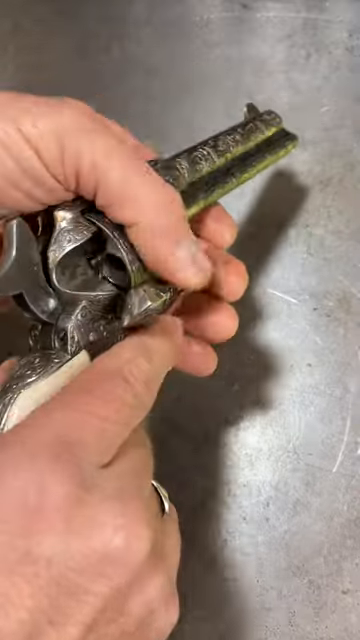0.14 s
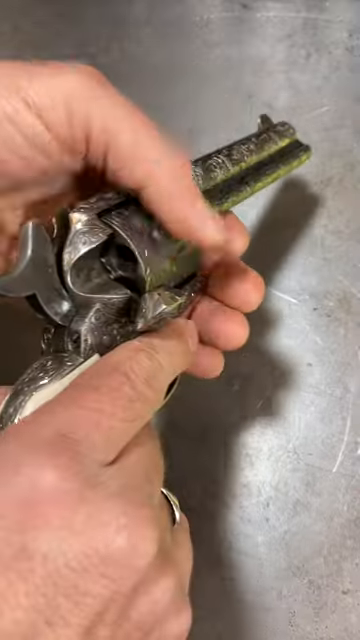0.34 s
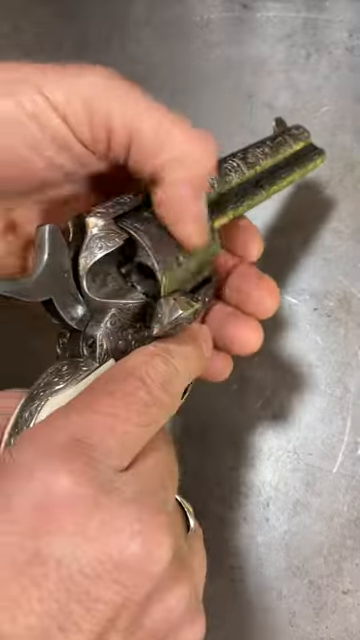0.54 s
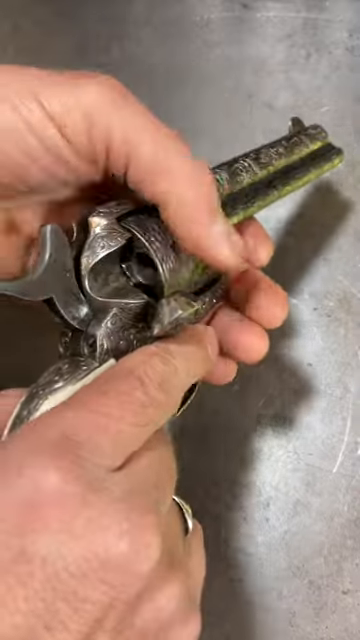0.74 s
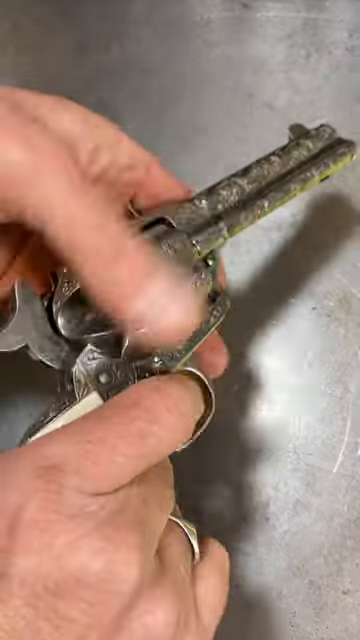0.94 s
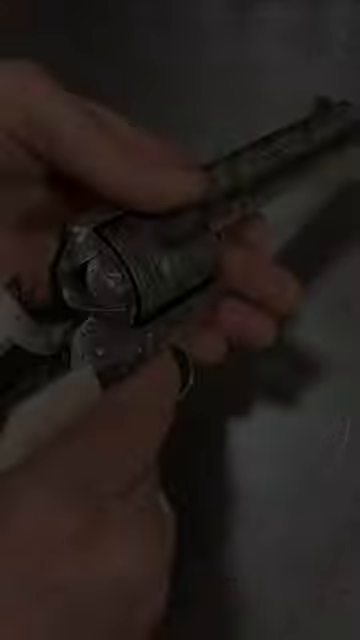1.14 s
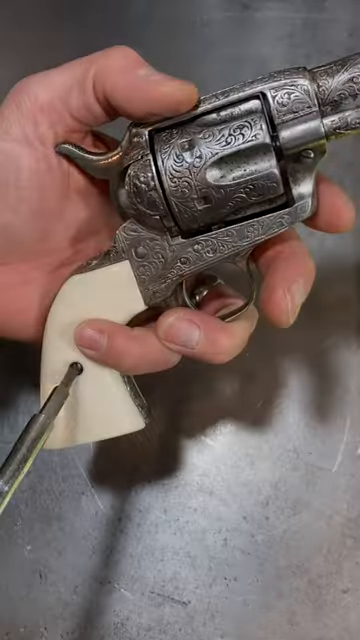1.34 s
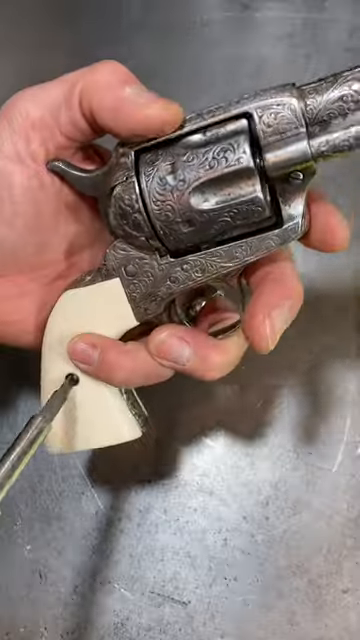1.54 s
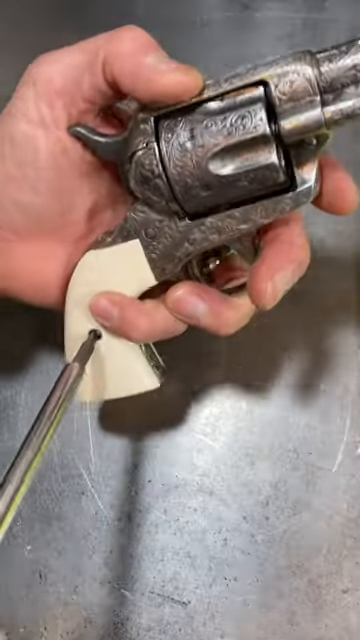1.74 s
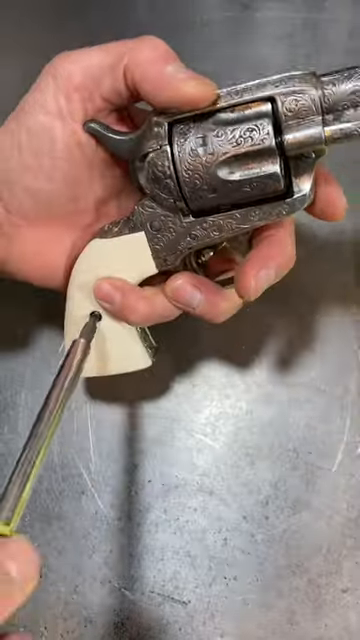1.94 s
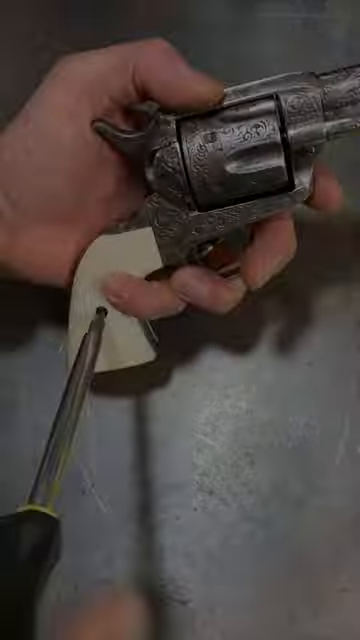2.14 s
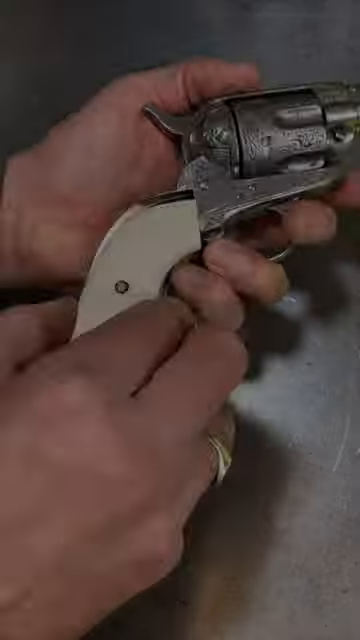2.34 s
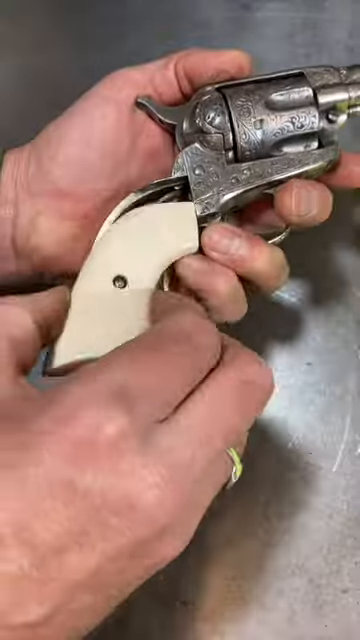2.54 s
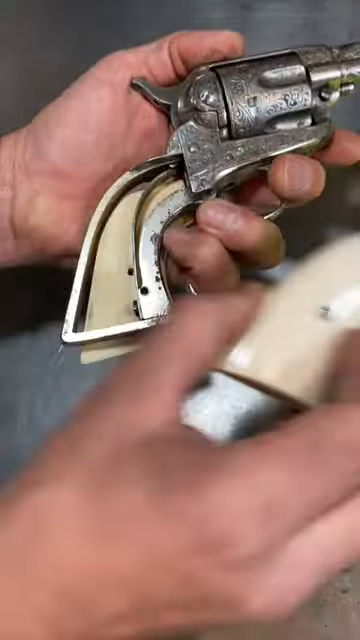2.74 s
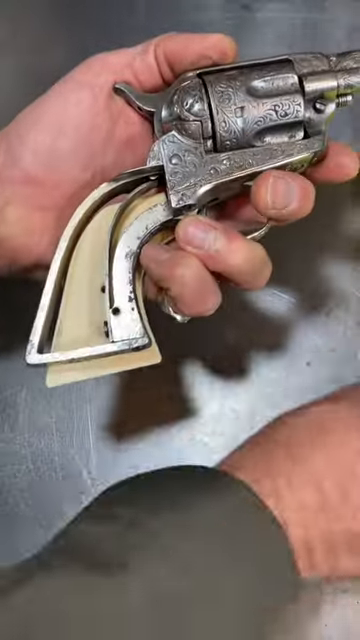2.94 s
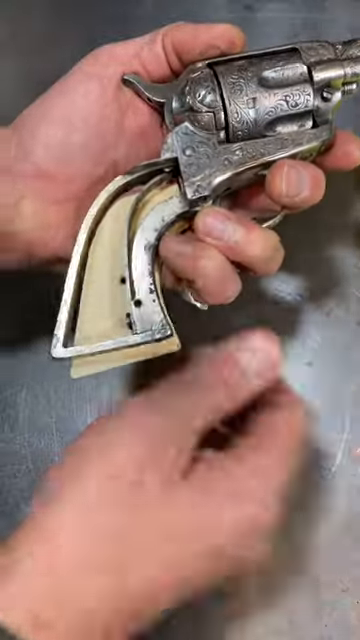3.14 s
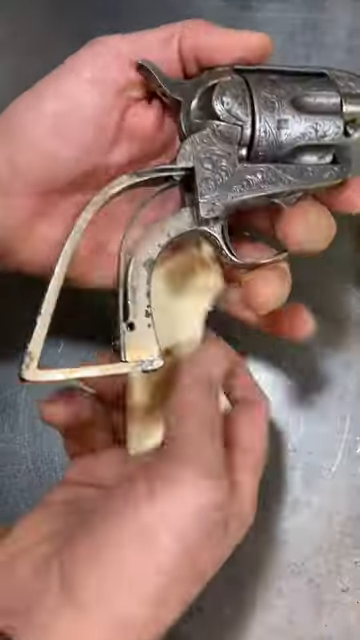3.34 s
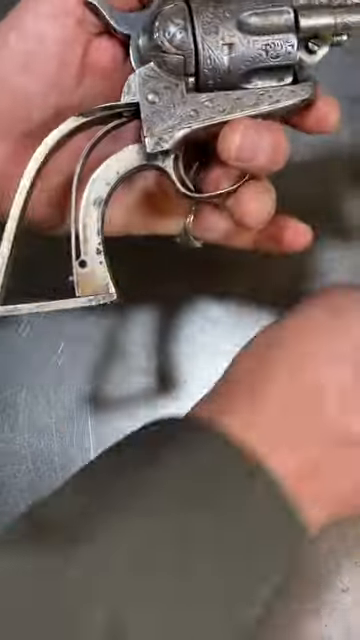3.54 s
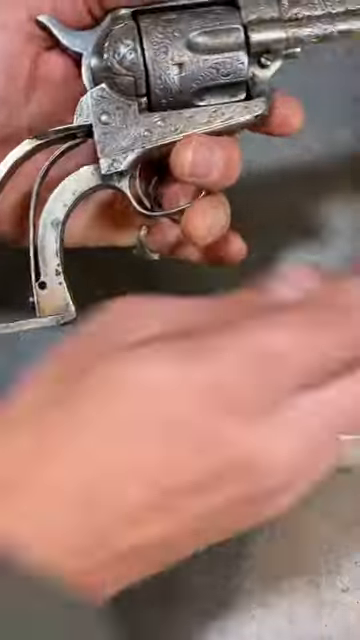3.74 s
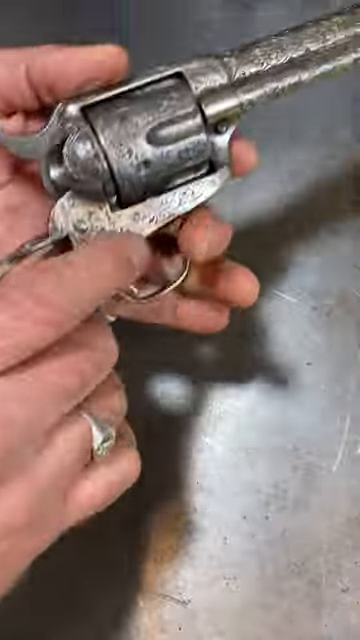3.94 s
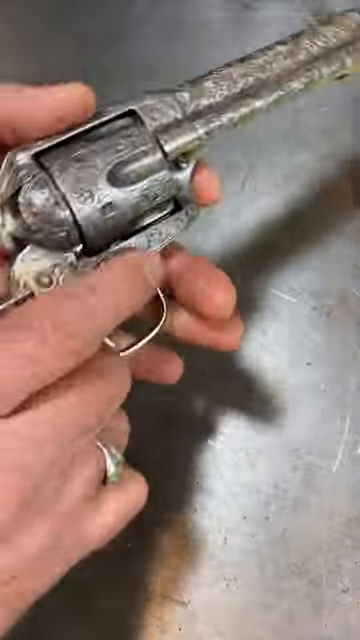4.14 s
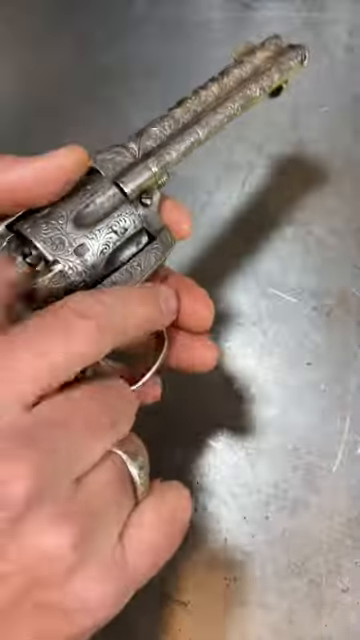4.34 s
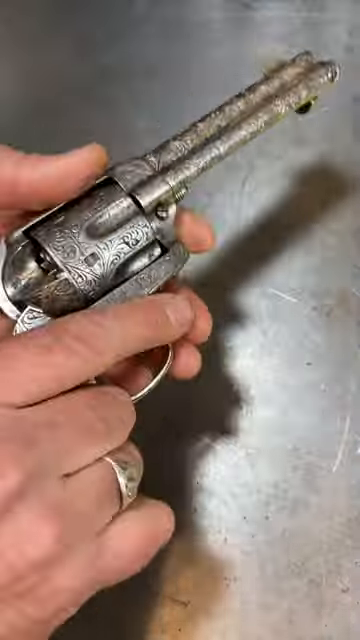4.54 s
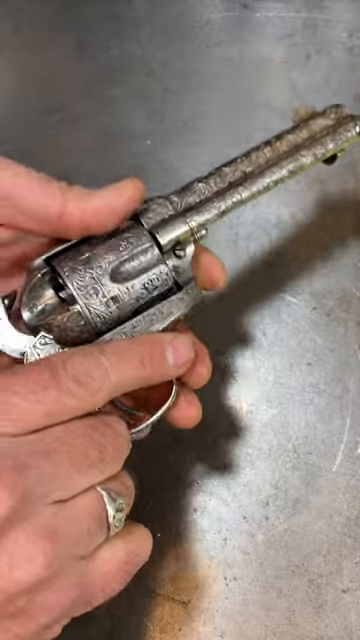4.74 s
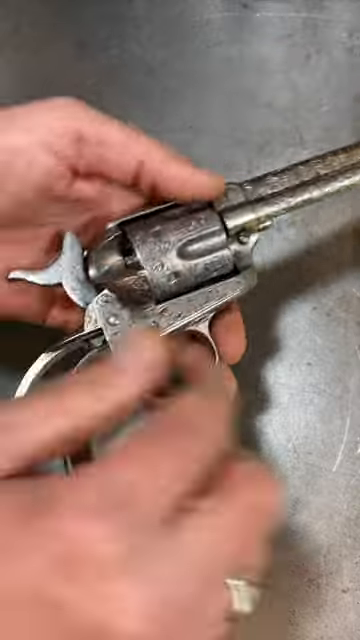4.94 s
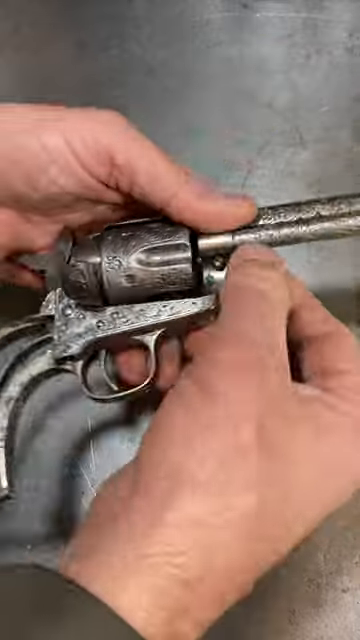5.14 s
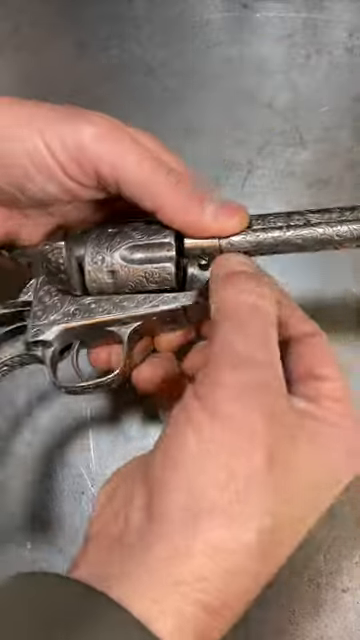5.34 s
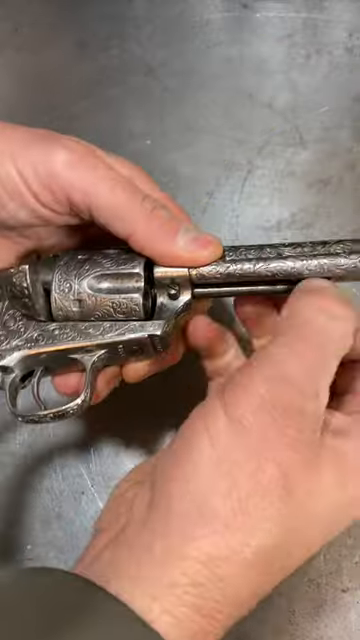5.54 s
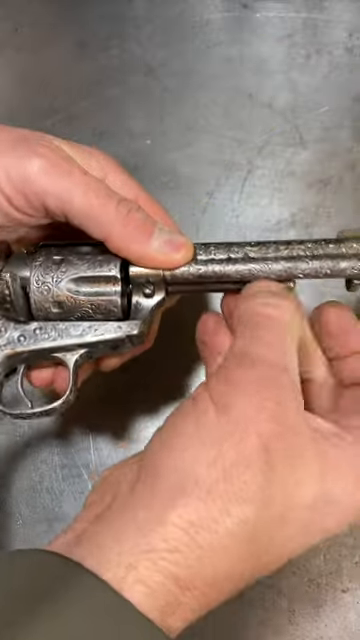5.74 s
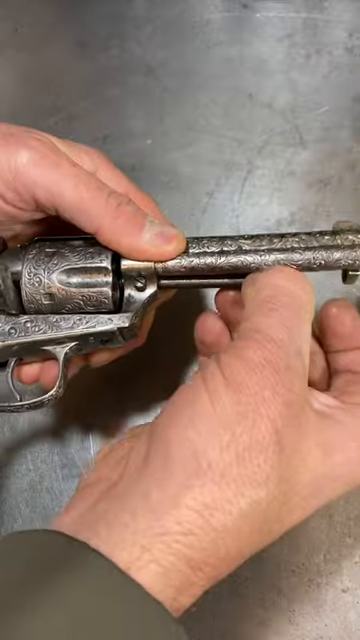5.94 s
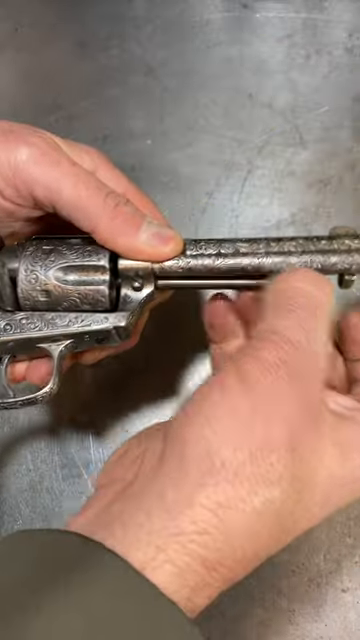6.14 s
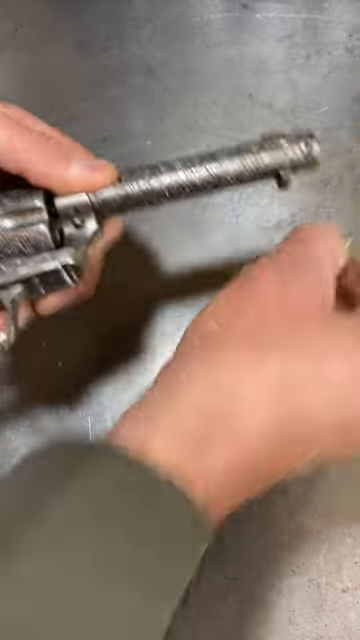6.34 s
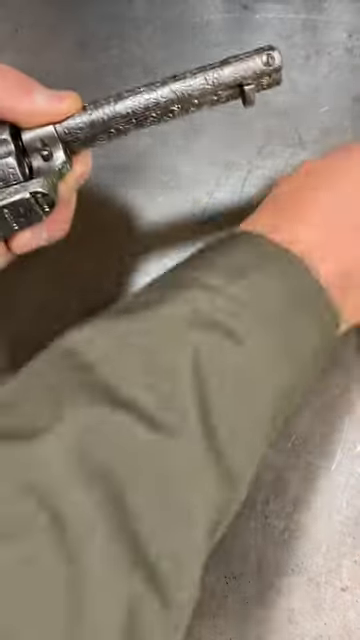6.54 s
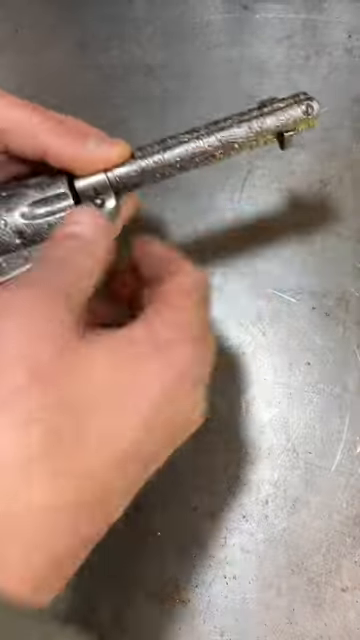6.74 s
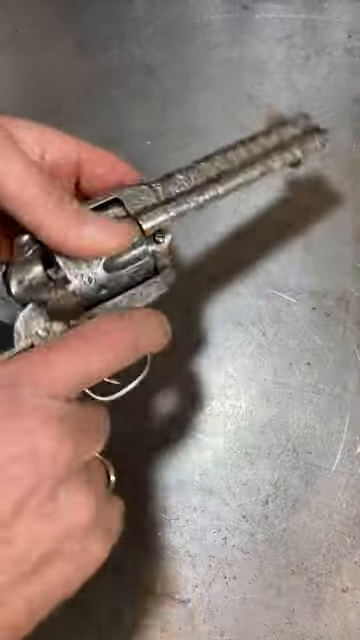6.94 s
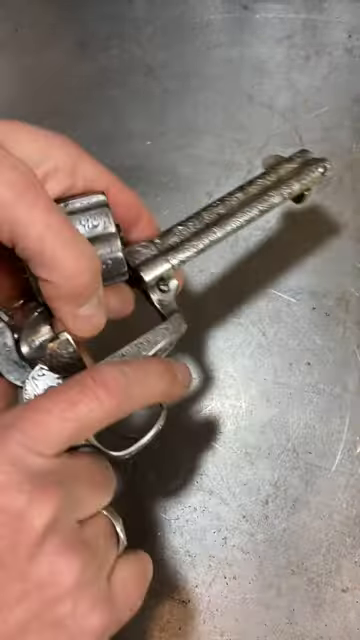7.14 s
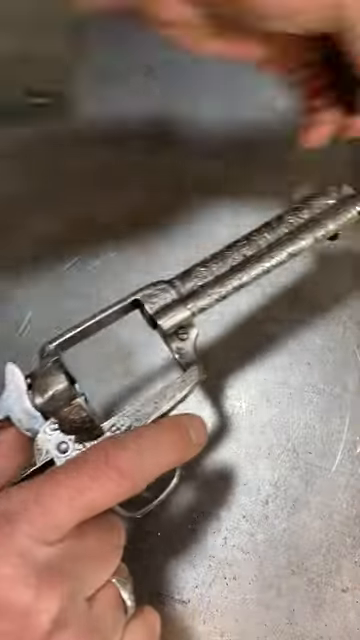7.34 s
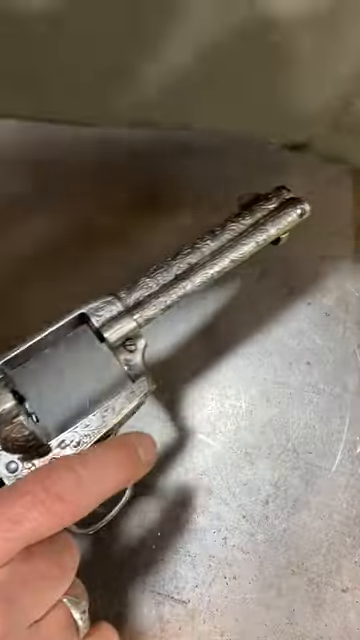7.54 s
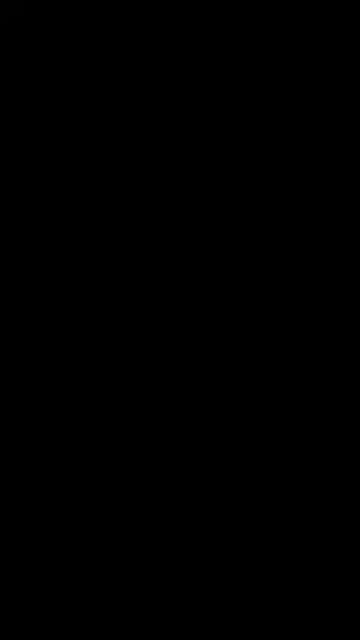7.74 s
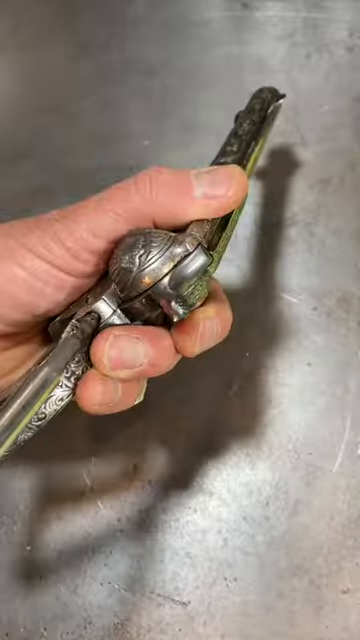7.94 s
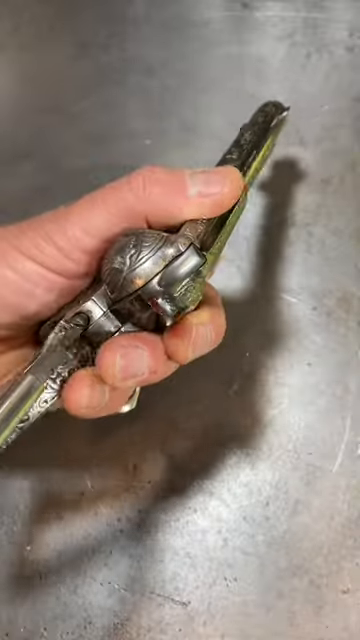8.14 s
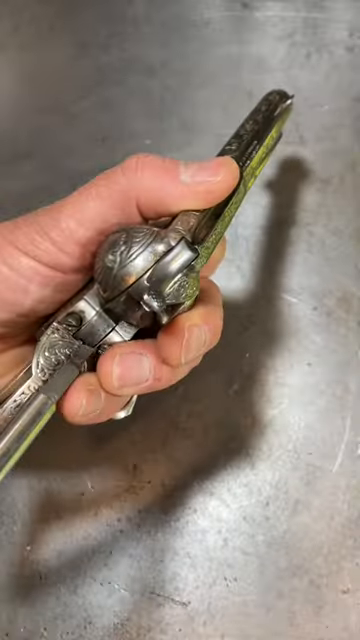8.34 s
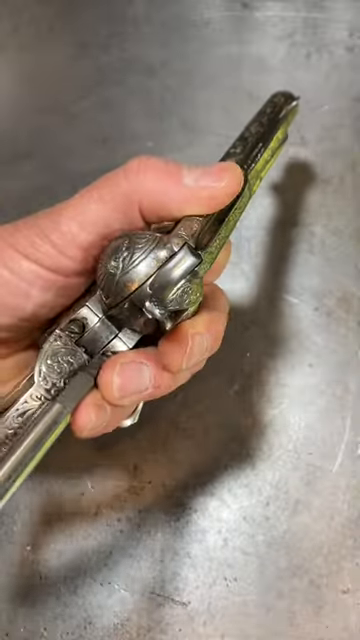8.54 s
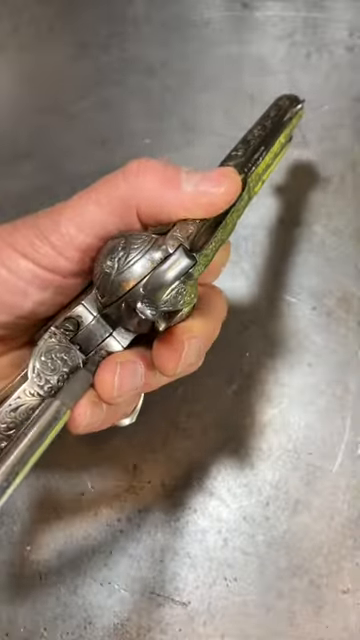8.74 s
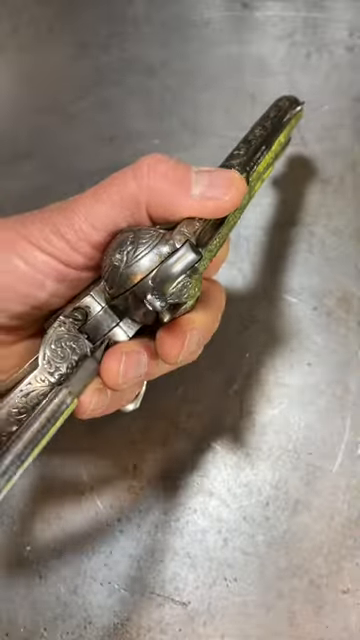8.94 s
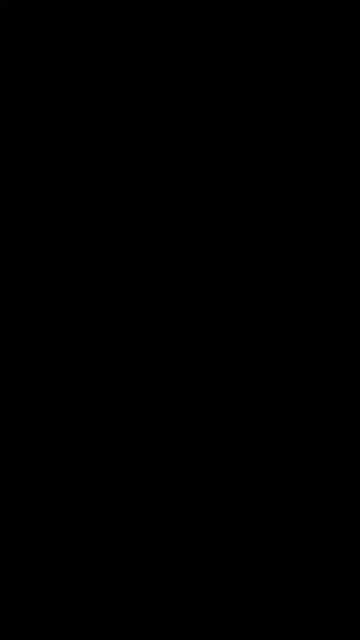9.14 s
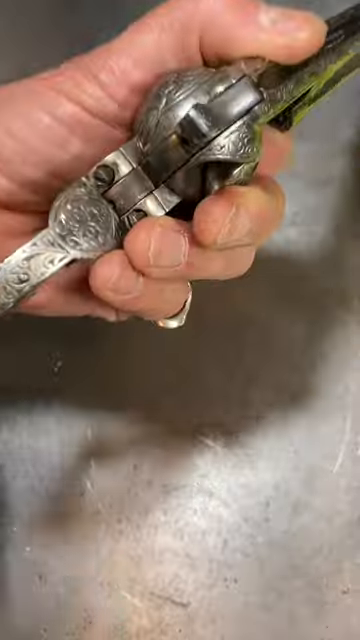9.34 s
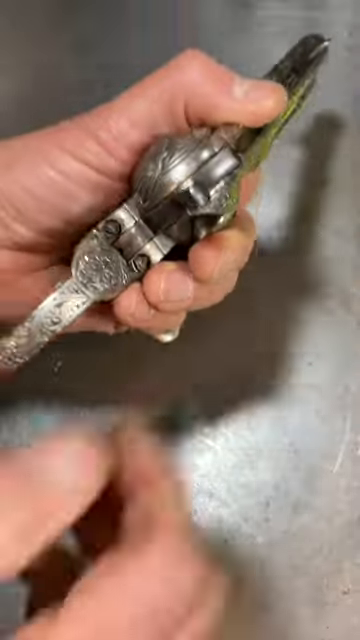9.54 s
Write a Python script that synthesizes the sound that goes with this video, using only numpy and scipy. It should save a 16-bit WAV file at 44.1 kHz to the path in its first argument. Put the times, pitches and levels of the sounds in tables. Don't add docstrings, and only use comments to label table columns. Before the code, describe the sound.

Close, crisp and mostly dry, in a quiet workshop with a short diffuse tail. From 0.1 to 0.9 s a revolver cylinder ratchets: six bright, sharp clicks roughly 0.13 s apart with tiny ticks between; a bolt drops at 1.0 and the hammer clicks at 1.14 and 1.2, the latter with a thin ping. Faint screwdriver ticks follow to 2.4, a double clack at 2.5, sleeve swishes around 2.9, a clear clink at 3.2 and a full bench thud at 3.6. Hard hammer clicks come at 4.3, 4.57 and 4.75. A soft pin scrape at 5.5 leads to small ticks, then a brief draw and sharp snap at 6.17. Cloth sweeps, a thud at 6.53, a clink at 6.93, scratchy cylinder rattle at 7.02-7.17, heavy thud at 7.55. Light screw ticks run 7.8-9.1; a swish and hard thud end near 9.4. Faint air and low machine hum shift abruptly between scenes.

```python
import sys
import numpy as np
from scipy import signal
from scipy.fft import rfft, irfft
from scipy.io import wavfile
from scipy.ndimage import uniform_filter1d

SR = 44100
rng = np.random.default_rng(int(sys.argv[2]) if len(sys.argv) > 2 else 0)


def undo_db(level):
    steps = np.asarray(level, float) / 20
    return 10 ** steps


def waveform_to_disk(signal):
    frames = np.transpose(np.atleast_2d(signal))
    scaled = np.clip(frames, -1, 1) * 32767
    samples = np.round(scaled).astype(np.int16)
    wavfile.write(sys.argv[1], SR, samples)


N = 426888
T = np.arange(N) / SR
STEP = 64
GRID = T[::STEP]

# t/s, peak level/dB, frame level/dB and barrel level/dB against the spring
RATCHET = [(0.0141, -35.5, -7, 9), (0.101, -34.5, -5.5, 3), (0.137, -9.5, -20.5, -4), (0.2676, -39, -7, -5),
           (0.2929, -8, -18.5, -6.5), (0.374, -48.5, -4, -1), (0.414, -34, -8, -8), (0.442, -9, -25.5, -4),
           (0.5759, -9, -22, -7.5), (0.68, -39.5, -8, -5), (0.7107, -8.5, -25, -2.5),
           (0.8075, -34.5, -22, -1), (0.826, -10.5, -21.5, -8), (0.9168, -36, -10, -7),
           (1.2191, -31.5, -1, -2.5), (0.195, -46, -3, 4)]
BOLT = [
    (1.0075, -11.5, -11, -0.65),
]
HAMMER = [(1.138, -9, -13, -15.5), (1.2064, -17, -12.5, -8), (4.2907, -3.5, -23, -22),
          (4.358, -37, 4.5, 6.5), (4.5661, -16, -6, -0.5), (4.7502, -16, -3, 5.5), (4.819, -35.5, -8, 10.5)]
GRIP_SCREW = [(1.356, -32.5, -20, -8), (1.396, -34.5, -24, 0), (1.4853, -31.5, -29, -8),
              (1.849, -32.5, -12, -20), (2.0425, -26, -14, -25), (2.1363, -32, -7.5, -20),
              (2.2034, -34.5, -12, -6.5), (2.2725, -39.5, 33, 33.5), (2.3451, -47.5, -10, -5),
              (2.425, -26.5, -10, -18), (2.512, -13.5, -16, -16), (2.5173, -16.5, -6, 7.5),
              (2.5305, -23.5, 9.5, 22), (2.912, -19, -5, -3), (3.1947, -19.5, -2, 47)]
AXLE = [(5.551, -48, 17, 0), (5.6276, -53, 16, 3), (5.7174, -32.5, 1, -16), (5.7311, -33, -9, -21),
        (5.8134, -43, 22, -10), (5.8402, -35, 23.5, 24), (5.9742, -47.5, 1, -15.4), (6.002, -56, -6, -8),
        (6.1727, -12, -14, -21), (6.2553, -23.5, -20, -21), (6.9329, -18.5, -10.5, 3.5),
        (6.261, -39.5, -20, -1), (6.207, -48, 12, 1), (7.352, -30, -11, 13)]
RATTLE = [(7.0235, -36, 13, -2), (7.0292, -27.5, -5, 5), (7.0332, -28, 19, 0), (7.0347, -28.5, 14, 1),
          (7.0366, -36, 12, 3), (7.058, -36, 10, 0), (7.0598, -25, 10.5, 1.5), (7.0615, -32.5, 10.5, 4),
          (7.0665, -33, 10, 0), (7.0675, -34, 12.5, -4), (7.0703, -32, -4, -4), (7.075, -37, 6, -4),
          (7.0782, -41, 9, 0), (7.0835, -31, 3, -5), (7.089, -32, -14, -0.5), (7.098, -21.5, -1, -8.5),
          (7.101, -31, 3, 7), (7.1242, -20.5, 18.5, 0.6), (7.1318, -31, 11, 0), (7.1422, -29, 17, 4),
          (7.1593, -33, 17, 5), (7.162, -39, 16, 3), (7.1646, -41, 16, 3), (7.1688, -40, 12, 4),
          (7.1715, -47, 15, 5), (7.1728, -45, 16, 3)]
STRAP_SCREW = [(7.8104, -47, -18.4, -10.6), (7.82, -42, -21, -3), (7.86, -38.5, -25, -25),
               (7.916, -24.5, -13, -12), (7.9267, -22.5, -0.5, -1), (7.986, -51, -20, -20),
               (8.067, -44, -16, -19), (8.096, -37, -15, -15), (8.106, -23.5, -15, -20),
               (8.1487, -22.5, -15.5, -15.5), (8.1973, -36, -9, -14), (8.22, -34, -11, -9.5),
               (8.2467, -39, -5, -3), (8.311, -30.5, -11, -29), (8.322, -46, -8, -10),
               (8.412, -43, -14, -19), (8.472, -38.5, -14, -19), (8.496, -33.5, -10, -17),
               (8.5923, -36.5, -9, -14), (8.621, -41, -4.5, -15), (8.652, -44, -18, -24),
               (8.684, -50, -15, -18), (8.746, -40, -11, -24), (8.8753, -39.5, -7, -18),
               (8.893, -41, -13, -15), (8.969, -32.5, -20, -14), (8.975, -34, -16, -13),
               (9.03, -57, -22, -22), (9.0676, -37, -18, -27)]
BUMPS = [(1.4076, -34, -1, 4), (1.508, -31, -3, -2), (3.6008, -19.5, -6, 6.5), (4.651, -56, 9, -5),
         (7.3924, -28.5, 16, 18), (7.689, -43.5, 10, -5), (7.7772, -34, 8, -9.4), (8.803, -49, 6, -5),
         (8.86, -44, 6, -4), (8.959, -43, 8, -5)]
KNOCK_DB = {"ratchet": -41, "bolt": -35, "hammer": -34.5, "grip screw": -33, "axle": -35.5, "rattle": -38,
            "strap screw": -31.5, "bumps": -3.5}
TIP_DB = {"ratchet": -0.5, "bolt": -5.5, "hammer": -3, "grip screw": -10.5, "axle": -7.5, "rattle": -12,
          "strap screw": -7, "bumps": -13.5}
# t/s, lift/dB of lower grip, upper grip, upper frame
LOW_LIFT = [(0.1375, 3, -9, 8.5), (0.2931, 4, -7, 7), (0.442, -3, 0, 8.5), (0.5766, -2.5, -1.5, 5.5),
            (0.7107, 7.5, 2, 4), (0.8261, -6, -4, 7.5), (1.0081, 6.5, -3, 6), (1.1382, -1, 2, 2),
            (1.2064, -2, 2, -1), (2.512, -15, -5, 6.5), (3.1948, 3, 7, 1), (4.2906, 8, -5.5, -2),
            (4.5662, 8.5, 4.5, -1), (4.7503, 0, 8, 0), (5.7176, 7.5, 10.5, -25), (6.1734, 1.5, -13.5, -3.5),
            (6.9331, 4, 0, 10), (7.1244, 2, 6, -3), (7.916, 4, -10, -11), (7.9267, 12, 8.5, -3),
            (8.106, 7, 5.5, 4), (8.1487, 9.5, 3, 4), (8.969, 4, 3, 8), (7.7774, 1.5, 4, -5.4)]
# t/s, lift/dB of upper spring, tip
TOP_LIFT = [(0.1375, -2, 4), (0.2931, 2.5, 3), (0.442, -2, 1), (0.5767, -0.5, 2), (0.7107, 2.5, 2.5),
            (0.826, 0, 4), (1.0081, -1, 1.5), (1.1382, 6.5, -2), (1.2064, 3.5, -12.5), (2.512, -8, 1),
            (3.1948, -8, -8), (4.2906, -4, 2), (4.5662, 0, 3.5), (4.7503, 2, 6), (5.7176, -14, -6),
            (6.1734, -0.5, 6), (6.2553, 1.5, 5.5), (6.9331, -1.5, -5), (7.916, -1.5, -1.5),
            (7.9267, 5.5, 0), (8.106, 6.5, 6), (8.1487, 4.5, 1.5), (8.969, -10.5, -2)]

# f/Hz, width/Hz, level/dB
GRIP = [(620, 900, -12), (1070, 820, 3), (1650, 320, 6), (2398, 650, 9)]
FRAME = [(2820, 1140, -13), (3210, 548, -7), (3700, 1560, -4), (4710, 360, -8), (5080, 590, -6.5)]
BARREL = [(6360, 1800, -7), (7500, 5900, -2.5), (7260, 1300, -1)]
SPRING = [(9630, 1800, -5), (10100, 280, -9), (11610, 1350, 6), (12550, 360, 1), (14060, 1300, -10.5)]
TIP = [(15290, 500, 0), (16000, 910, -3.5)]
PARTS = GRIP[:2], GRIP[2:], FRAME[:3], FRAME[3:], BARREL, SPRING[:2], SPRING[2:], TIP
PART_DB = [-4, 2, -1, -1, 2, -4, 0]
NO_BASS = [signal.butter(4, 0.7 * peaks[0][0], "high", fs=SR, output="sos") for peaks in PARTS]
# f/Hz, level/dB, t60/s
CYLINDER = [(7140, -17.5, 0.092), (7908, -10, 0.086), (8350, -16.5, 0.13), (10000, -17, 0.13),
            (10400, -12.5, 0.091), (10800, 0, 0.09), (12100, 8, 0.076), (12920, 1.5, 0.065)]

# t/s, level/dB, treble level/dB
PIN_SLIDE = [(5.42, -68, -76), (5.45, -62, -77), (5.47, -54, -56), (5.51, -47, -53), (5.525, -76, -86),
             (5.535, -82, -85)]
PIN_DRAW = [(6.135, -76, -79), (6.15, -60, -71), (6.158, -45, -52), (6.164, -59, -47), (6.171, -44, -61),
            (6.175, -73, -75)]
CYLINDER_SLIDE = [(7.018, -55, -57), (7.03, -51, -52.5), (7.045, -45, -46), (7.075, -54, -53),
                  (7.1, -67, -64), (7.115, -80, -79.5), (7.147, -56, -72), (7.173, -42, -62),
                  (7.178, -81, -83)]
# f/Hz, width/Hz, level/dB
PIN = [(2486, 160, -2.5), (3330, 540, -1.5), (4600, 460, -2.5), (5830, 860, -4.5)]
# f/Hz, width/Hz, level/dB
CHAMBER = [(3180, 860, 0), (4100, 290, 0.0056), (5150, 380, 0)]
# t/s, f/Hz, peak level/dB, t60/s
SUNG_NOTES = [
    (1.2064, 12600, -21, .016),
    (3.1948, 6250, -17, 0.017),
    (6.1734, 3180, -28, 0.011),
    (6.1729, 5410, -30.5, 0.014),
    (6.261, 8410, -45, 0.03),
    (7.9265, 1990, -33.5, 0.014),
    (8.219, 11100, -44, .07),
    (1.8484, 910, -40.5, .025),
    (2.412, 1800, -49, .025),
]

# t/s, level/dB of its sag, drum, plate and edge modes
THUDS = [
    (2.907, -36.5, -34, -42, -58),
    (3.601, -33, -26.5, -27.5, -25),
    (4.443, -43.5, -66, -72, -64),
    (6.53, -32.5, -29, -29.5, -42),
    (7.555, -27, -25.5, -28.5, -40.5),
    (9.377, -26.5, -28, -20.5, -27),
    (9.606, -53, -54, -53, -50),
]
# f/Hz, level/dB, t60/s
SAG = [(108.3, -7.5, 0.25), (140, 7, 0.044)]
DRUM = [(228, -6, 0.2), (249.7, 0, 0.17), (304, -14, 0.14)]
PLATE = [(356, 4, 0.14), (383, -3, 0.29), (445, -15, 0.15), (455, -8, 0.057), (520, -3, 0.11),
         (561.6, 6, 0.083)]
EDGE = [(630, 6.5, 0.039), (693, -5, 0.22), (806, 0.5, 0.064), (885, -4.5, 0.041), (936, -4.5, 0.075),
        (1090, -19, 0.08), (1255, -15, 0.13), (1360, -14, 0.043)]

# peak t/s, rise/s, fall/s, level/dB, brightness/dB
SWISHES = [(1.499, 0.042, 0.081, -61.5, 0), (1.79, 0.33, 0.27, -68.5, 3.5),
           (2.419, 0.05, 0.033, -68.5, 5.5), (2.779, 0.093, 0.17, -55, 3), (2.86, 0.083, 0.11, -47.5, 1.5),
           (3.0, 0.044, 0.12, -54.5, 2.5), (3.49, 0.1, 0.33, -56, 3.5), (3.6, 0.33, 0.23, -64, -9.5),
           (3.72, 0.12, 0.17, -56.5, 4), (4.24, 0.13, 0.21, -64, 0), (5.01, 0.11, 0.12, -55, 4.5),
           (5.231, 0.049, 0.084, -82, 19.5), (5.519, 0.24, 0.31, -69, 2), (6.381, .08, 0.25, -53, 4),
           (6.47, 0.069, 0.11, -60.5, -2), (6.625, 0.077, 0.15, -52, 4.5), (6.74, 0.074, 0.17, -60, 3.5),
           (7.389, 0.19, 0.22, -65, 7.5), (7.62, 0.25, 0.35, -70, 4.5), (8.969, 0.83, 1, -67.5, 1),
           (9.32, 0.13, 0.22, -55.5, 7), (9.531, 0.14, 0.19, -55.5, 3.5)]
# t/s, f/Hz, lift/dB, half length/s
FOLDS = [(2.76, 1200, 6, 0.016), (2.858, 1580, 2.5, 0.035), (3.0, 1950, 5, .025), (3.55, 1500, 12, 0.03),
         (3.72, 2420, 9, .03), (4.99, 1360, 3, 0.022), (4.998, 4200, 8.5, 0.0074), (6.372, 1520, 9, .035),
         (6.62, 1830, 4, .04)]
# t/s, level/dB
HANDS = [(0.0, -72), (0.65, -75.5), (1.1, -71), (1.34, -81), (1.42, -75), (2.21, -69.5), (2.33, -79),
         (2.679, -79), (3.1, -60), (3.4, -76), (4.05, -75), (4.51, -84), (4.9, -69), (5.311, -80.5),
         (6.088, -84), (6.87, -65.5), (7.25, -76), (7.7, -71)]

# t/s, level/dB
AIR = [(0.0, -70.5), (0.6, -69), (0.85, -64), (1.15, -70.5), (3.5, -71), (4.72, -76), (6.31, -77.5),
       (6.9, -80), (7.23, -104), (7.57, -73), (9.25, -71.5), (9.68, -87)]
AIR_HZ = [90, 350, 1500, 3300]
# f/Hz, level/dB
AIR_SHAPE = [(30, 18), (55, -12), (90, 6), (170, 8.5), (350, 2), (900, 0), (3000, 1.5), (12000, 0)]
# t/s, f/Hz, level/dB
HUM = [
    [(1.25, 156, -60), (2.206, 160.6, -57.5), (2.32, 157, -63)],
    [(2.38, 147.6, -59.5), (2.89, 145.3, -59), (4.42, 138.4, -56), (4.9, 134.4, -73.5), (6.45, 138.3, -72)],
    [(7.85, 165.8, -69.5), (8.902, 170.6, -66.5), (9.2, 161.6, -77)],
    [(9.24, 156, -51), (9.424, 153.4, -63), (9.68, 160, -56)],
]
# f/Hz, level/dB
MAINS = [(479.1, -81.5)]
# f/Hz, t60/s, level/dB
ROOM = [(494, 0.11, -18.5), (1830, 0.13, -18.5), (5000, 0.12, -18.5), (9900, 0.03, -9.5),
        (13800, 0.13, -17)]
# f/Hz, lead of the left port/rad
PORTS = [(780, -1.1), (1120, 7.5), (2900, 6), (4390, 7), (8180, 8), (10200, 4.5), (13400, 12.5),
         (15500, 9.5)]
# f/Hz, level/dB of the ports' difference against their sum
SPLIT = [(60, -28.5), (300, -13.5), (1400, 3), (3800, -3), (5500, 0), (9200, -2), (10700, -11.5),
         (12000, 0.5)]


def clicks():
    out = np.zeros((2, N))
    tables = RATCHET, BOLT, HAMMER, GRIP_SCREW, AXLE, RATTLE, STRAP_SCREW, BUMPS
    chatters = True, True, False, False, False, False, False, False
    every = []
    for job in zip(tables, chatters, KNOCK_DB.values(), TIP_DB.values()):
        rows, *settings = job
        every += [(*row, *settings) for row in rows]
    times = np.array([event[0] for event in every])
    for event, low, high in zip(every, lifts(times, LOW_LIFT), lifts(times, TOP_LIFT)):
        s, db, frame_db, barrel_db, chatter, knock_db, tip_db = event
        grip_db = max(frame_db, barrel_db, 0) + min(knock_db - 0.55 * db, 3.5)
        row = (db, grip_db + low[0], grip_db + low[1], frame_db, frame_db + low[2],
               barrel_db, 0, high[0], tip_db + high[1])
        if chatter:
            add(out, blow(row, contact_ms=1.2, ring_db=-17.0), s - 0.0017)
            bounce_s, bounce_db = 0.01, -21
            add(out, blow(row, contact_ms=1.2, ring_db=-28.5) * undo_db(bounce_db), s + bounce_s - 0.0017)
        else:
            add(out, blow(row, contact_ms=0.51, ring_db=-37) * undo_db(np.array([[0], [-4.0]])), s - 0.0014)
    return out


def blow(row, contact_ms, ring_db):
    db, *share_db = row
    t, ms = T[:3600], T[:1200] * 1000
    u = ms / contact_ms
    force = u ** 0.83 * np.exp(-1.6 * u) + 0.043 * np.minimum(u, 1) * np.exp(-ms / 5.4)
    impacts = rng.standard_normal(len(u)) * undo_db(4.0 * rng.standard_normal(len(u)))
    chatter = top(impacts * force)
    chatter[int(contact_ms * SR / 2000)] = 0.88 / contact_ms
    spectrum = rfft(np.pad(chatter, (64, 784)))
    chatter = irfft(spectrum / np.sqrt(uniform_filter1d(np.abs(spectrum) ** 2, size=32)))
    chatter[:64] *= np.linspace(0, 1, 64) ** 4
    far = undo_db(ring_db) * top(ring(CYLINDER, t, scatter_db=-5.0, detune=0.004))
    levels_db = np.add(share_db, PART_DB + [0])
    signs = 1, 1, 1, -1, -1, 1, 1, -1
    for level_db, peaks, no_bass, sign in zip(levels_db, PARTS, NO_BASS, signs):
        add(far, sign * undo_db(level_db) * top(signal.sosfilt(no_bass, knock(peaks, T[:520]))), 0)
    near = signal.fftconvolve(chatter, far)[:len(t)] / np.linalg.norm(chatter)
    return np.array([near, far]) / np.max(np.abs(near)) * undo_db(db + 1.5)


def lifts(times, rows):
    out = np.zeros((len(times), len(rows[0]) - 1))
    for s, *db in rows:
        out[np.argmin(np.abs(times - s))] = db
    return out


def knock(peaks, t):
    modes = [(hz, db, 2.01 / width) for hz, width, db in peaks]
    return ring(modes, t, scatter_db=3.5, detune=0.024, turn=-0.9)


def ring(modes, t, scatter_db, detune, turn=None):
    hz, db, t60 = np.transpose(modes)[:, :, None]
    luck = rng.standard_normal((3, len(modes), 1))
    wave = np.sin(2 * np.pi * hz * (1 + detune * luck[0]) * t) * np.exp(-np.log(1000) * t / t60)
    sign = turn ** np.arange(len(modes))[:, None] if turn else np.sign(luck[1])
    return np.sum(sign * undo_db(db + scatter_db * luck[2]) * wave, axis=0)


def scrape(rows, peaks, stick_db=2.5):
    stick = np.interp(T, GRID, stick_db * walk(450))
    ticks = rng.standard_normal(N) * undo_db(2.5 * rng.exponential(size=N) + stick)
    body = unit(sum(undo_db(db) * unit(band(ticks, hz, width)) for hz, width, db in peaks))
    treble = unit(band(ticks, 10800, 4400))
    s, db, treble_db = np.transpose(rows)
    return (body * undo_db(np.interp(T, s, db, -150, -150))
            + treble * undo_db(np.interp(T, s, treble_db, -150, -150)))


def sung_notes():
    out, t = np.zeros(N), T[:4000]
    for s, *mode in SUNG_NOTES:
        add(out, ring([mode], t, scatter_db=-2, detune=0) * np.minimum(t / 0.00036, 1), s)
    return out


def thuds():
    out, t = np.zeros(N), T[:12000]
    u = t[:1200]
    for s, *share_db in THUDS:
        push = np.exp(-u / 0.000072) + 0.12 * rng.standard_normal(len(u)) * np.exp(-u / 0.011)
        for db, modes in zip(share_db, (SAG, DRUM, PLATE, EDGE)):
            low_hz, high_hz, t60 = 0.896 * modes[0][0], modes[-1][0], max(1.59 * modes[0][2], 0.2)
            noise = rng.standard_normal(len(t))
            wash = unit(band(noise, (low_hz + high_hz) / 2, high_hz - low_hz, order=3))
            wash *= 0.24 * np.exp(-np.log(1000) * t / t60) * np.minimum(t / 0.0011, 1)
            answer = ring(modes, t, scatter_db=3.3, detune=0.006, turn=1.0)
            clear = top(signal.fftconvolve(push, answer)[:len(t)])
            add(out, (clear + wash) * undo_db(db + 4.0), s + 0.00277)
    return signal.sosfilt(signal.butter(3, [85, 3000], "band", fs=SR, output="sos"), out)


def cloth_and_air():
    columns = cloth_and_air_levels()
    per_hz = np.array(columns) - 10 * np.log10([[65], [380], [1700], [8000]])
    per_hz[1] = np.maximum(per_hz[1], per_hz[2] - 1.5)
    rubbing = np.clip((columns[2] + 68) / 12, 0, 1)
    shared, out = walk(25), 0
    for hz in 35 * 2 ** np.arange(0, 9, 1 / 3):
        column = np.arange(len(AIR_HZ))
        place = np.interp(np.log(hz), np.log(AIR_HZ), column)
        db = np.maximum(1 - np.abs(column - place), 0) @ per_hz
        db += table(AIR_SHAPE, hz) + 10 * np.log10(hz * 0.24)
        db += 1.3 * shared + 2.0 * walk(min(hz / 8, 30))
        db += rubbing * np.exp(-np.log(hz / 1400) ** 2 / 0.25) * (1.5 + 2.5 * walk(70))
        for s, fold_hz, lift_db, half in FOLDS:
            db += lift_db * np.exp(-((GRID - s) / half) ** 2 - np.log(hz / fold_hz) ** 2 / 0.11)
        db += -2.5 * rubbing * np.exp(-np.log(hz / 2860) ** 2 / 0.13)
        out = out + np.interp(T, GRID, undo_db(db)) * unit(band(rng.standard_normal((2, N)), hz, hz * 0.23))
    return out


def cloth_and_air_levels():
    shop, hands = (np.interp(GRID, *np.transpose(rows)) for rows in (AIR, HANDS))
    s, _, _, plate_db, _ = np.transpose(THUDS)[:, :, None]
    boom = np.where(GRID > s, plate_db - 31.5 - 41.5 * (GRID - s), -200)
    s, rise, fall, db, bright_db = np.transpose(SWISHES)[:, :, None]
    length = np.where(GRID < s, rise, fall)
    curve = np.where(GRID < s, 1.88, 1.55)
    sweep = db - 24 * (np.abs(GRID - s) / length) ** curve
    rumble = together(shop, boom - 5.0)
    murmur = together(shop - 1.5, boom)
    cloth = together(hands, sweep)
    hiss = together(hands + 2.5, sweep + bright_db)
    return [rumble, murmur, cloth, hiss]


def hum():
    out = sum(undo_db(db + 3.5) * np.sin(2 * np.pi * hz * T) for hz, db in MAINS)
    drift, swell = (np.interp(T, GRID, walk(rate)) for rate in (12, 14))
    for rows in HUM:
        s, hz, db = np.transpose(rows)
        phase = 2 * np.pi * np.cumsum(np.interp(T, s, hz) * (1 + 0.0049 * drift)) / SR
        edge = np.clip(np.minimum(T - s[0], s[-1] - T) / 0.033, 0, 1)
        level = undo_db(1.8 * swell) * undo_db(np.interp(T, s, db) + 7.5)
        out = out + edge * level * np.sin(phase)
    return out


def room(x):
    t, tail = T[:14000], 0
    for hz, t60, db in ROOM:
        noise = unit(band(rng.standard_normal((2, len(t))), hz, 1.21 * hz))
        tail = tail + undo_db(db) * noise * np.exp(-np.log(1000) * t / t60)
    tail = tail * np.clip((t - 0.002) / 0.0013, 0, 1) / 20
    return signal.fftconvolve(x[None], tail, axes=1)[:, :N]


def ports(x):
    hz = np.fft.rfftfreq(N, 1 / SR)
    lead = table(PORTS, hz) / 2
    fade = undo_db(-7.0 * np.clip((hz - 12600) / 900, 0, 1))
    mid, side = irfft(rfft(x) * [fade * np.cos(lead), 1j * np.sin(lead)], N)
    return np.array([mid + side, mid - side])


def diffuse(x):
    hz = np.fft.rfftfreq(N, 1 / SR)
    fade = undo_db(-14.0 * np.clip((hz - 11800) / 1400, 0, 1)) * (hz < 13150)
    mid, side = irfft(rfft(x) * [fade, undo_db(table(SPLIT, hz)) * (hz < 15900)], N)
    return np.array([mid + side, mid - side])


def unit(x):
    return x / np.sqrt(np.mean(x ** 2) + 1e-30)


def top(x):
    return x / np.max(np.abs(x))


def band(x, hz, width_hz, order=2):
    edges = [max(hz - width_hz / 2, 10), min(hz + width_hz / 2, 0.49 * SR)]
    return signal.sosfilt(signal.butter(order, edges, "band", fs=SR, output="sos"), x)


def table(rows, hz):
    f, v = np.transpose(rows)[:2]
    return np.interp(np.log(hz + 1), np.log(f + 1), v)


def walk(rate):
    k = max(int(SR / STEP / rate), 1)
    held = np.repeat(rng.standard_normal(len(GRID) // k + 1), k)
    return 1.45 * uniform_filter1d(uniform_filter1d(held, k), k)[:len(GRID)]


def together(*levels_db):
    return 10 * np.log10(np.sum(10 ** (np.vstack(levels_db) / 10), axis=0))


def add(out, x, s):
    i = int(s * SR)
    n = min(x.shape[-1], out.shape[-1] - i)
    out[..., i:i + n] += x[..., :n]


def scene():
    near, far = clicks()
    bench, sung = thuds(), sung_notes()
    slide = (scrape(PIN_SLIDE, PIN) + scrape(CYLINDER_SLIDE, CHAMBER, stick_db=3.8)
             + scrape(PIN_DRAW, PIN, stick_db=3.5))
    tail = room(far + 0.15 * sung + 0.32 * slide + bench)
    return ports(near + slide + sung) + bench + hum() + diffuse(tail + cloth_and_air())


def low_pass(x):
    return signal.sosfilt(signal.butter(12, 17150, fs=SR, output="sos"), x)


def record(dry):
    x = signal.sosfilt(signal.butter(5, 72, "high", fs=SR, output="sos"), dry)
    x = signal.sosfilt(signal.butter(8, 17050, fs=SR, output="sos"), x)
    return low_pass(x)


dry = scene()
out = record(dry)
waveform_to_disk(out)
```